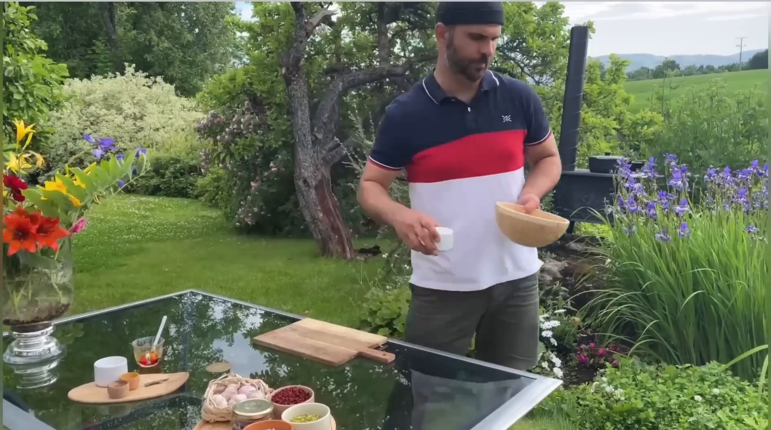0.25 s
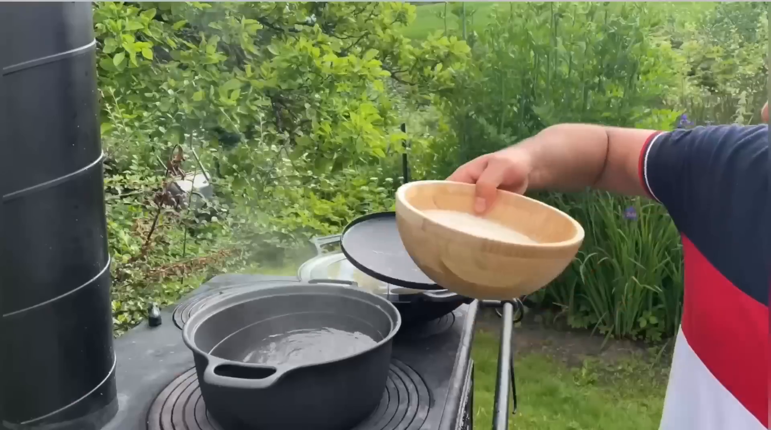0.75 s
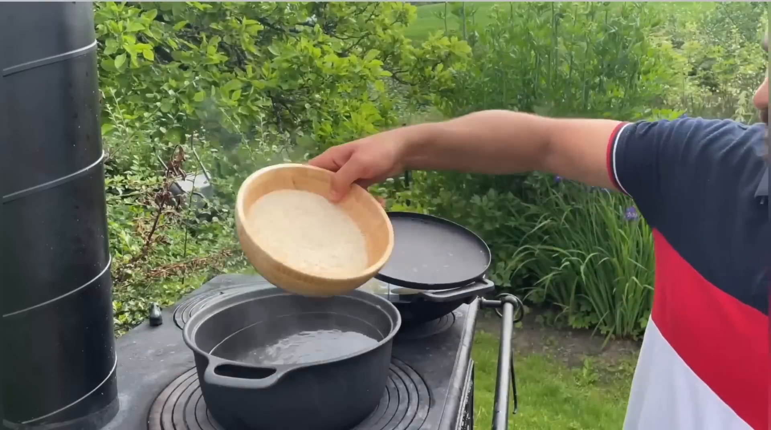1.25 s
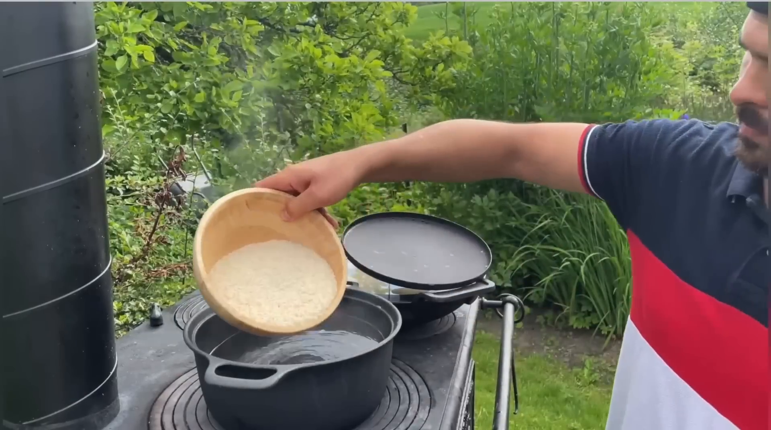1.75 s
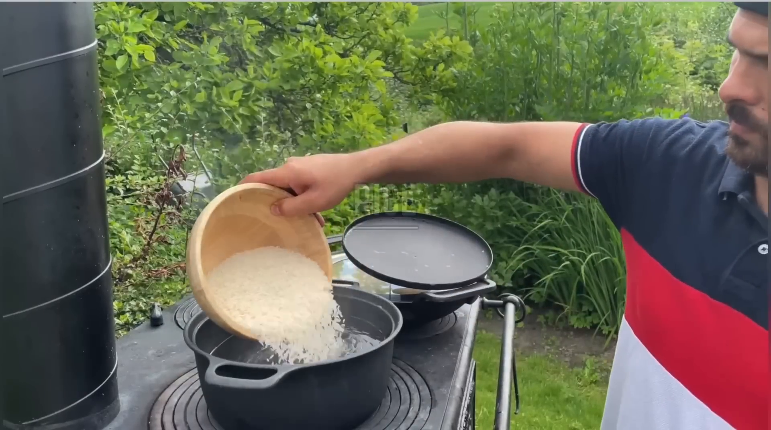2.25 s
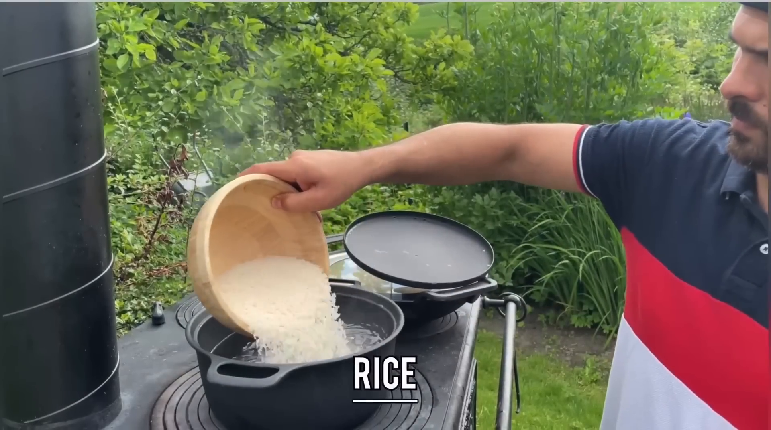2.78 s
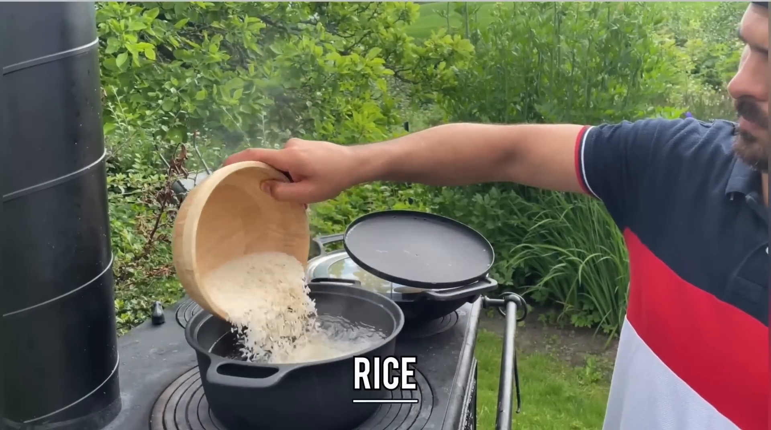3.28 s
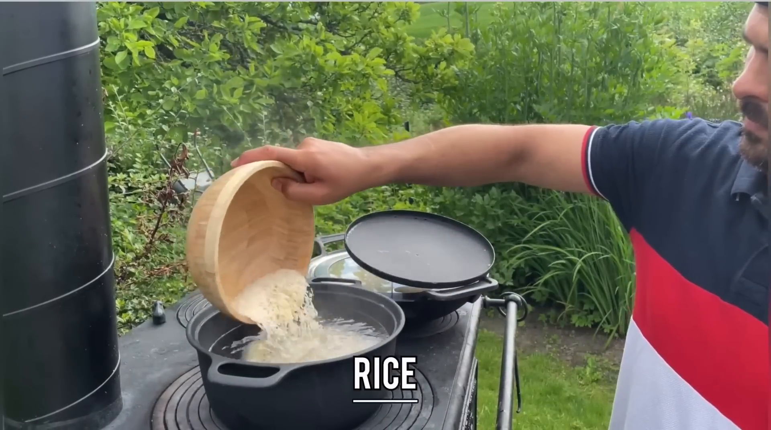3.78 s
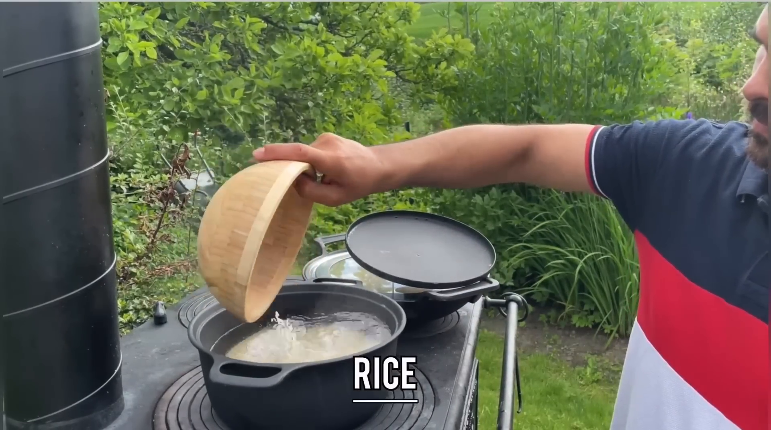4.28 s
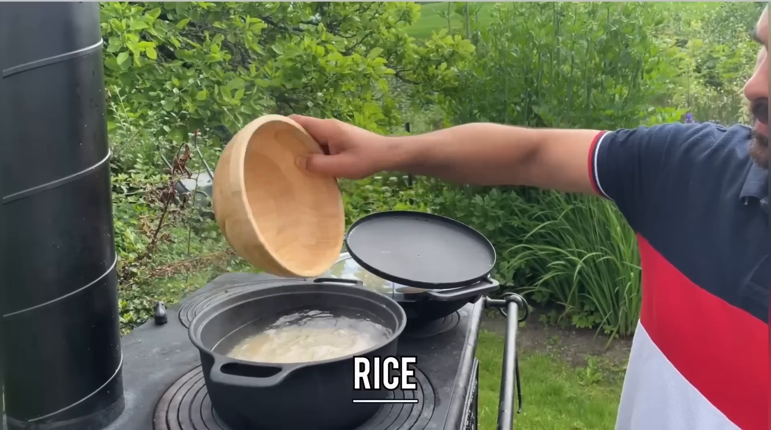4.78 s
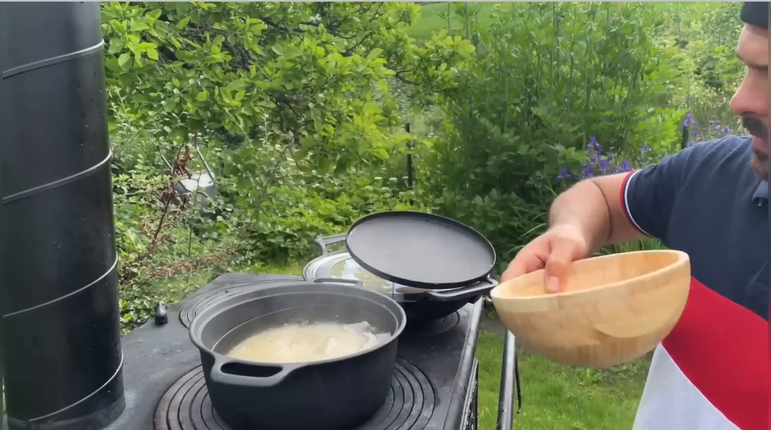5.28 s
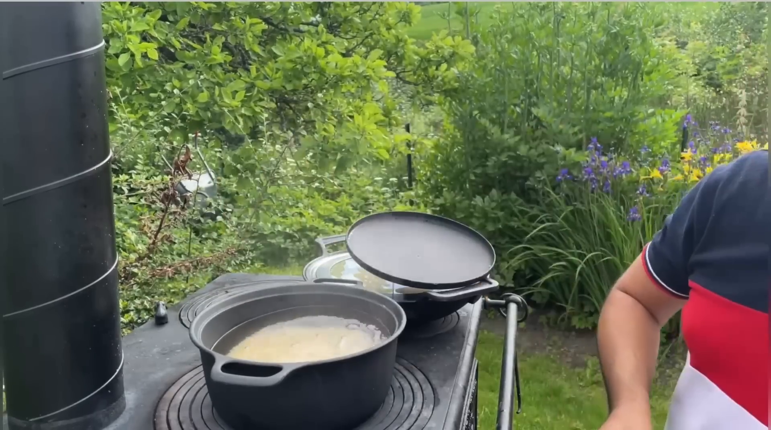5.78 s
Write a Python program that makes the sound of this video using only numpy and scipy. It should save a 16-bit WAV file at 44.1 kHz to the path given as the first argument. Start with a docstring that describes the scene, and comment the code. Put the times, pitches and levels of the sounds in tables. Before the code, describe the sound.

In a garden, a dull steady roar runs under low wind buffets on the microphone. Dry rice slides in a wooden bowl, then pours into a pot of water in rustling, hissing surges of tiny taps. As the last grains fall, the water fizzes faintly, with a thin hum and small rustles. Finally the empty bowl is set on a table with a sharp clack.

```python
"""A garden, heard through a two-port microphone: a dull steady roar and low buffets of wind.
At 0.63 s the background roar cuts abruptly to a duller colour. Dry rice slides out of a wooden bowl
in surges and patters into a pot on a stove, thousands of tiny taps a second. As the last grains
fall, the water fizzes faintly; a thin hum comes and goes, with small rustles nearby. At the end
the empty bowl clacks down on a table and rocks briefly."""
import sys
import numpy as np
from scipy import signal
from scipy.fft import rfft, irfft
from scipy.io import wavfile
from scipy.ndimage import uniform_filter1d

SR = 44100
rng = np.random.default_rng(int(sys.argv[2]) if len(sys.argv) > 2 else 0)


def log_audio(samples):
    """Write samples as a 16-bit WAV file to the path given in sys.argv[1]."""
    # one column per channel
    frames = np.atleast_2d(samples).T
    # limit to full scale, then quantise
    limited = np.clip(frames, -1, 1)
    pcm = np.round(limited * 32767).astype(np.int16)
    wavfile.write(sys.argv[1], SR, pcm)


N = 266260

# stereo image of the background noise, with a band at 7-9.6 kHz in opposite phase between left and right:
# f/Hz, likeness/0-1, left lead/rad, left minus right/dB
NOISE_IMAGE = [(61, 0.86, 0, 1), (194, 0.97, 0.25, -1), (576, 0.94, 2, 4.5), (1207, 0.84, 2.5, 4.5),
               (1510, 0.89, 4, 1), (1780, 0.28, 5.5, 3), (2180, 1, 7, 0.5), (3860, 0.7, 8.5, 4),
               (5100, 0.3, 6.5, 4.5), (6600, 0.04, 5, 0), (7200, 1, np.pi, 0), (9600, 1, np.pi, 0),
               (11000, 1, 1.5, 0)]


def rice():
    """Grains run over the rim in a thin stream; surges make the patter swell and change its brightness."""
    # trickle from the tipped bowl: t/s, level/dB, extra treble/dB
    trickle = [(1.896, -56.5, -10), (2.05, -67, -12), (2.2, -66, -2), (2.35, -56, 0.5), (2.61, -60, -7),
               (2.82, -53, -4), (3.1, -53.5, -5), (3.32, -54, -13), (3.55, -48.5, -4), (3.65, -54.5, -5.5),
               (3.8, -62, -7), (4.05, -53.5, -5), (4.14, -58.5, -8), (4.2, -64.5, -11), (4.26, -66, -7),
               (4.3, -83, -6)]
    patter = grain_patter()
    body = signal.oaconvolve(patter, signal.firwin(129, 10000, fs=SR)[None], "same")  # below 10 kHz
    t = np.arange(N) / SR
    times, level_db, treble_db = np.transpose(trickle)
    gate = np.clip(np.minimum(t - times[0], times[-1] - t) / 0.011, 0, 1)
    stream = gate * gain_of(np.interp(t, times, level_db))
    surge, surge_treble = np.sqrt(surge_power(t))
    treble = np.hypot(stream * gain_of(np.interp(t, times, treble_db)), surge_treble)
    treble *= gain_of(1.2 * drift(3.2))  # the treble flickers
    return np.hypot(stream, surge) * body + treble * (patter - body)


def grain_patter():
    """Grains of uneven size tap on bowl and pot in clumps; the wood rings while it holds rice."""
    # tone colour of the taps: f/Hz, relative level/dB
    colour = [(1200, -30), (1900, -7), (2400, -10), (2850, -1), (3200, -4), (3600, 1), (4050, -6),
              (5100, 1), (5550, -7), (6050, -9), (6500, -4), (6900, -1.5), (7600, -3), (9000, -5),
              (10300, -2), (11000, -3), (11500, -6), (11800, -18)]
    # stereo image given to the patter, with a band at 7.5-9.5 kHz in opposite phase between left and
    # right: f/Hz, likeness/0-1, left lead/rad, left minus right/dB
    image = [(1500, .4, 4, 1), (2000, .7, 6.2, 2), (2800, .7, 7.6, 2), (3700, .3, 9.4, 11),
             (4500, .6, 13, 5), (5300, .7, 13, 7), (6000, .4, 12, 0), (6900, .6, 11.5, 3),
             (7500, 1, 3 * np.pi, 0), (9550, 1, 3 * np.pi, 0), (9900, .93, 9, 0), (10400, .75, 8, 0),
             (10900, .7, 7, 0), (11400, .9, 6.3, -1)]
    # strength of the bowl's resonance: t/s, boost/dB
    ring_boost = [(1.3, 1.5), (1.9, 6), (2.15, 8.5), (2.3, 6), (2.7, 1), (3.1, 4.5), (3.4, 1), (4.3, 1.5)]
    grains_per_s, sparkle_hz, ring_hz, ring_width_hz = 12000, 9800, 2780, 470
    taps = rng.choice([-1., 1.], (2, N)) * (rng.random((2, N)) < grains_per_s / SR)
    size_db = 2.2 * np.minimum(rng.exponential(1, (2, N)), 5)
    taps *= gain_of(size_db + 0.43 * drift(37))
    patter = unit_rms(patchy(in_stereo(taps, colour, image), depth_db=2.0, frames=5, bins=3))
    highpass = signal.firwin(257, sparkle_hz, pass_zero=False, fs=SR)
    sparkle = signal.oaconvolve(patter, highpass[None], "same")
    spurts = patchy(sparkle, depth_db=3.5, frames=7, bins=4)  # the finest grains come in spurts
    patter = patter - sparkle + spurts
    ring = signal.lfilter(*signal.iirpeak(ring_hz, ring_hz / ring_width_hz, SR), patter)
    return patter + (gain_of(curve(ring_boost)) - 1) * ring


def surge_power(t):
    """Each shake of the bowl sends rice sliding: the power of body and treble swells, holds and dies."""
    # surges of rice: middle t/s, peak level/dB, hold/s, extra treble/dB
    surges = [(1.357, -51.5, 0.03, -22), (1.438, -43, 0.07, -11.5), (1.92, -59, .025, -20),
              (2.03, -48.5, 0.012, -18), (2.165, -52.5, 0.035, -8.5), (2.25, -52.5, 0.01, -10),
              (2.701, -46.5, 0.058, -22), (2.864, -55, 0.0096, 1), (2.96, -47.5, 0.02, -8),
              (3.162, -50.5, 0.015, -9), (3.266, -50.5, 0.021, -23), (3.381, -47.5, 0.03, -6),
              (3.738, -50, 0.029, -17), (3.882, -50, 0.073, -11), (3.999, -49.5, 0.011, -1)]
    # the rice slips loose and stops short: start t/s, end t/s
    slides = [(1.331, 1.545), (1.898, 4.3)]
    rise_s, fall_s, edge_s = 0.028, 0.038, 0.027  # rise and fall span the 6 dB next to the hold
    power = np.zeros((2, len(t)))
    for middle, db, hold, treble_db in surges:
        early = np.maximum(middle - hold / 2 - t, 0) / rise_s
        late = np.maximum(t - middle - hold / 2, 0) / fall_s
        power += gain_of(np.array([[db], [db + treble_db]]) - 6 * (early + late) ** 2) ** 2
    loose = sum(np.clip(np.minimum(t - start, end - t) / edge_s, 0, 1) for start, end in slides)
    return power * loose ** 2


def bowl_clack():
    """Each contact with the table rings the bowl's damped modes; nearby things echo it."""
    # the bowl lands and rocks: t/s, peak level/dB, softness/0-1
    contacts = [(5.8735, -22, 1), (5.8745, -9.5, 0.08), (5.8756, -14.5, 0.48), (5.8768, -16, 0.06),
                (5.8785, -22, 0.34), (5.8843, -23, 0.26), (5.8866, -22, 0.74), (5.892, -29, 0.56)]
    # modes of the bowl on the table: f/Hz, left level/dB, right level/dB, t60/s
    modes = [(300, -19, -18, 0.02), (573, -4, -15, 0.015), (856, -9.5, -9, 0.012), (1140, -2.5, 1.5, 0.02),
             (1684, -16, -0.5, 0.011), (1883, -3.5, -0.5, 0.016), (2340, 3.5, 2.5, 0.011),
             (2910, -3, -2, 0.013), (3080, 8, 0, 0.0073), (3725, 8.5, 2.5, 0.0088), (4160, 4.5, -9, 0.0074),
             (4980, -0.5, -9, 0.01), (6350, -4, -18, 0.011), (6800, -14, -18, 0.013),
             (7700, -29, -34, 0.0038), (8900, -30, -21, 0.0032), (10300, -27, -24, 0.0097)]
    t, dry = np.arange(3000) / SR, np.zeros((2, N))
    for start, db, soft in contacts:
        spots_db = 2.5 * rng.standard_normal(len(modes))  # each contact strikes another spot
        ring = np.zeros((2, len(t)))
        for (hz, left_db, right_db, t60), spot_db in zip(modes, spots_db):
            dulling_db = 20 * soft * np.log2(1 + hz / 3000)
            mode_db = np.array([[left_db], [right_db]]) + spot_db - dulling_db
            ring += gain_of(mode_db - 60 * t / t60) * np.sin(2 * np.pi * hz * t)
        ring *= 1 - np.exp(-t / (0.00037 + 0.0013 * soft))  # soft contacts have a slower attack
        add(dry, start, gain_of(db) * ring / abs(ring).max())
    lag = np.arange(6000) / SR
    echoes = rng.standard_normal((2, 6000)) * gain_of(-41.0 - 60 * lag / 0.13) * (lag > .002)
    return dry + signal.oaconvolve(dry, lowpass(echoes, hz=6500), axes=1)[:, :N]


def wind():
    """Lumpy low turbulence on the microphone, much alike in both ports, and buffets whose pitch sinks."""
    # wind strength: t/s, level/dB
    strength = [(0.0, -44.5), (0.7, -61.5), (1.2, -43.5), (2.0, -48.5), (3.2, -44.5), (3.8, -42),
                (4.4, -47.5), (6.04, -53)]
    # single buffets: t/s, peak level/dB, f/Hz, rise/s
    buffets = [(0.94, -32, 70.6, 0.009), (0.982, -31.5, 51, 0.021), (1.031, -29, 66, 0.018),
               (1.467, -32.5, 72.5, 0.016), (3.075, -36, 83.4, 0.011), (3.116, -37, 79, 0.012),
               (3.133, -33.5, 90, 0.02), (3.163, -34, 70.6, 0.033), (3.433, -30, 79.5, 0.018),
               (3.499, -30, 61.6, 0.016), (3.587, -30.5, 53.4, 0.027), (3.651, -26.5, 60.5, 0.025),
               (3.684, -33.5, 52, 0.027), (3.744, -41, 212, 0.018), (3.776, -43, 87, 0.02),
               (3.843, -25, 70, 0.019), (3.897, -32.5, 66, 0.019), (3.937, -27, 75, 0.029),
               (3.982, -31.5, 75.5, 0.055), (4.034, -23, 71, 0.0095), (4.188, -26, 61.5, 0.018),
               (4.307, -32, 71, 0.014), (4.24, -43, 61, 0.025), (4.903, -34.5, 116, 0.02),
               (4.924, -23.5, 71, 0.018), (4.96, -31.5, 45, 0.032)]
    sink_per_s, tail_stretch, steepness = 20, 1.43, 0.17
    shared, left, right = lowpass(rng.standard_normal((3, N)), hz=55)
    rumble = unit_rms(lowpass(shared + 0.7 * np.array([left, right]), hz=110))
    out = rumble * gain_of(curve(strength) + 4.1 * drift(4.75))
    t = np.arange(-.08 * SR, .08 * SR) / SR
    for (peak_s, db, hz, rise), (turn, side) in zip(buffets, rng.random((len(buffets), 2))):
        offset = 0.15 + 0.12 * (turn - .5)  # a buffet pushes first, then sucks
        angle = 2 * np.pi * (hz * (1 - np.exp(-sink_per_s * t)) / sink_per_s + offset)
        wave = np.cos(angle + steepness * np.sin(angle))  # steep fronts add overtones
        pan = gain_of(3. * (side - .5) * np.array([[1], [-1]]))
        envelope = swell(t, rise * np.where(t > 0, tail_stretch, 1))
        add(out, peak_s - .08, gain_of(db) * pan * envelope * wave)
    return out


def roar():
    """A wavering bed of background noise; at 0.63 s it cuts abruptly to a duller colour."""
    # the opening roar: f/Hz, level in a 1 Hz band/dB
    opening_colour = [(30, -85), (60, -69), (120, -70), (220, -80), (400, -72.5), (700, -74), (1000, -70.5),
                      (1400, -79), (2000, -95), (3000, -101.8), (5200, -102.2), (5700, -106.0),
                      (8000, -104.5), (11200, -112.8)]
    # the duller roar that follows: f/Hz, level in a 1 Hz band/dB
    duller_colour = [(30, -77), (60, -62), (120, -76.5), (170, -76.5), (240, -84), (400, -77.5),
                     (700, -73.5), (1000, -76), (1150, -80), (1450, -88), (2000, -96), (3000, -105.8),
                     (5200, -112.5), (5700, -116.2), (6900, -120), (10500, -120), (11500, -126)]
    switch_s = 0.632
    noise = white_noise() * gain_of(0.31 * drift(11.0) + 0.87 * drift(21))
    switched = np.clip((np.arange(N) / SR - switch_s) / 0.009, 0, 1)
    before = in_stereo(noise, opening_colour, NOISE_IMAGE)
    after = in_stereo(noise, duller_colour, NOISE_IMAGE)
    return (1 - switched) * before + switched * after


def rustles():
    """Small dry rustles and ticks nearby: short puffs of broad noise round a centre pitch."""
    # puffs: t/s, level/dB, rise and fall/s, centre f/Hz
    puffs = [(0.296, -61.5, 0.07, 8650), (4.554, -61, .006, 8600), (4.618, -71, 0.02, 8700),
             (4.68, -74, 0.0088, 6500), (4.688, -62, 0.0068, 4170), (4.71, -71, 0.054, 5530),
             (4.918, -67, .006, 6000), (5.295, -68, 0.05, 3720), (5.642, -66.5, 0.027, 6500)]
    t, out = np.arange(-2048, 2048) / SR, np.zeros((2, N))
    for peak_s, db, rise, hz in puffs:
        hump = [(hz / 3, -15), (hz, 0), (hz * 2.3, -14)]
        puff = unit_rms(in_stereo(rng.standard_normal((2, 4096)), hump, NOISE_IMAGE))
        add(out, peak_s + t[0], gain_of(db) * puff * swell(t, rise))
    return out


def hum():
    """A faint wavering tone, louder on the left."""
    # the hum comes and goes late on: t/s, level/dB
    levels = [(0, -79), (2.9, -74.5), (3.6, -60.5), (4.1, -69.5), (4.7, -79), (5.25, -60.5), (5.7, -64),
              (6.04, -61)]
    pitch_hz = 322.5 + 1.21 * drift(2.84)
    tone = np.sqrt(2) * np.sin(2 * np.pi * np.cumsum(pitch_hz) / SR)
    return tone * gain_of(curve(levels) + np.array([[1.], [-1.]]))


def fizz():
    """Once the rice is in, a thin wavering hiss rises from the water and slowly settles."""
    # hiss of the pot at its onset: f/Hz, level in a 1 Hz band/dB
    colour = [(3000, -120), (5000, -114), (8500, -111), (11500, -116)]
    start_s, fade_db_per_s = 4.1, 3.5
    since = np.arange(N) / SR - start_s
    noise = white_noise() * gain_of(1.9 * drift(6.3) - fade_db_per_s * since)
    return np.clip(since / 0.09, 0, 1) * in_stereo(noise, colour, NOISE_IMAGE)


def in_stereo(pair, colour, image):
    """Colours two unrelated signals and blends them into the given stereo image."""
    hz = np.fft.rfftfreq(pair.shape[1], 1 / SR)
    left, unrelated = rfft(pair) * gain_of(columns_at(colour, hz)[0])
    likeness, lead, balance_db = columns_at(image, hz)
    likeness = np.clip(likeness, 0, 1)
    right = likeness * np.exp(-1j * lead) * left + np.sqrt(1 - likeness ** 2) * unrelated
    balance = gain_of(balance_db)
    keep_power = np.sqrt(2 / (1 + balance ** 2))
    return irfft(np.array([left * balance, right]) * keep_power, pair.shape[1])


def patchy(x, depth_db, frames, bins):
    """Lets small patches of time and pitch swell and fade at random."""
    spectra = signal.stft(x, nperseg=512)[2]
    patches = uniform_filter1d(rng.standard_normal(spectra.shape[1:]), bins, axis=0)
    patches = uniform_filter1d(patches, frames, axis=1)
    return signal.istft(spectra * gain_of(depth_db * unit_rms(patches)), nperseg=512)[1][:, :N]


def drift(rate):
    """Slow random modulation of rms one, changing about rate times a second."""
    return unit_rms(lowpass(rng.standard_normal(N + SR), rate, order=2)[SR:])


def white_noise():
    """Two channels of noise with unit power per hertz."""
    return rng.standard_normal((2, N)) * np.sqrt(SR / 2)


def swell(t, width):
    """Bell-shaped envelope, 24 dB down at width either side of zero."""
    return np.exp(-np.log(16) * (t / width) ** 2)


def lowpass(x, hz, order=1):
    """Rolls off the highs above hz."""
    return signal.sosfilt(signal.butter(order, hz, fs=SR, output="sos"), x)


def curve(points):
    """Automation line through (time, value) points."""
    return np.interp(np.arange(N) / SR, *np.transpose(points))


def columns_at(rows, hz):
    """Reads every column of a table at the frequencies hz."""
    f, *columns = np.transpose(rows)
    return [np.interp(np.log(hz + 1), np.log(f + 1), column) for column in columns]


def gain_of(db):
    """Decibels to gain."""
    return 10 ** (np.asarray(db) / 20)


def unit_rms(x):
    """Scales to an rms of one."""
    return x / np.sqrt(np.mean(x ** 2) + 1e-20)


def add(mix, start_s, sound):
    """Lays a sound into the mix."""
    part = mix[..., round(start_s * SR):][..., :sound.shape[-1]]
    part += sound[..., :part.shape[-1]]


def scene():
    """All sources in stereo."""
    return roar() + rice() + wind() + rustles() + bowl_clack() + fizz() + hum()


def record(dry):
    """The microphone drops the deepest bass; the top is cut off steeply."""
    low_cut_hz, high_cut_hz = 37, 11800
    thin = signal.sosfiltfilt(signal.butter(2, low_cut_hz, "highpass", fs=SR, output="sos"), dry)
    high_cut = signal.firwin(511, high_cut_hz, window=("kaiser", 9), fs=SR)
    return signal.oaconvolve(thin, high_cut[None], "same")


dry = scene()
out = record(dry)
log_audio(out)
```